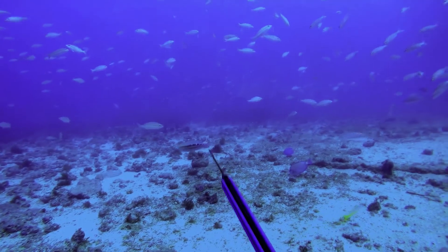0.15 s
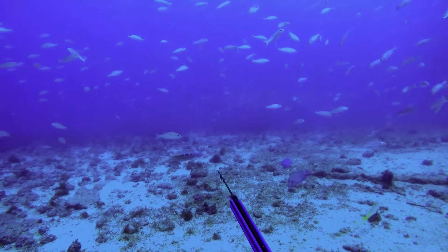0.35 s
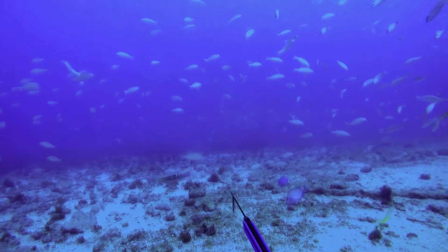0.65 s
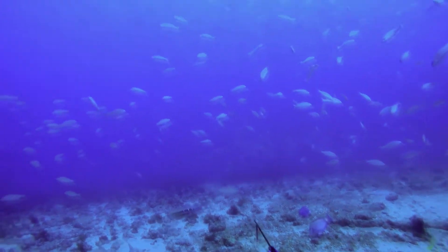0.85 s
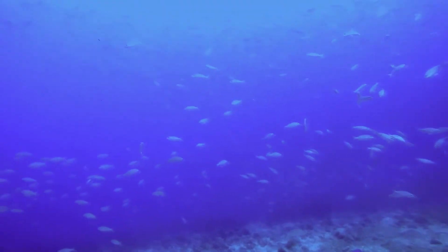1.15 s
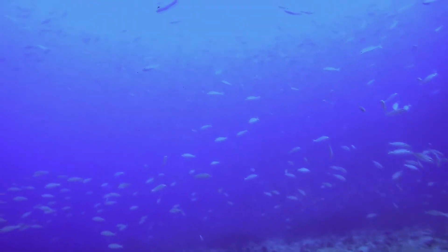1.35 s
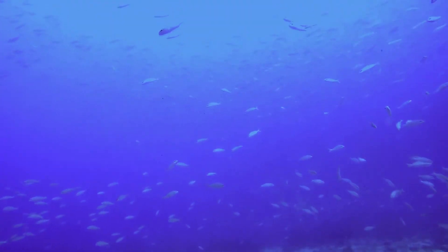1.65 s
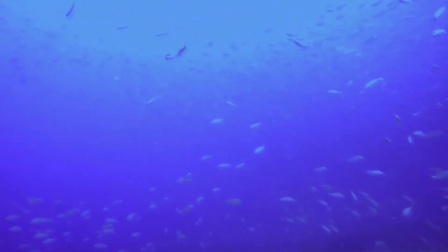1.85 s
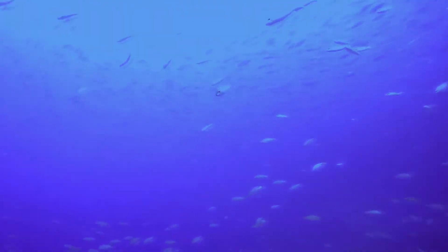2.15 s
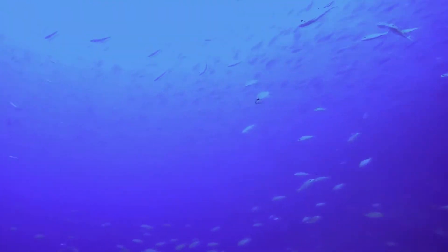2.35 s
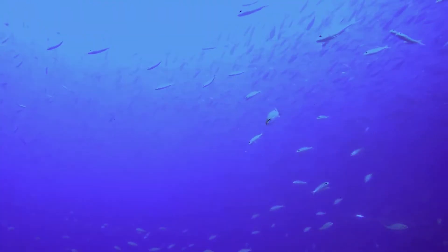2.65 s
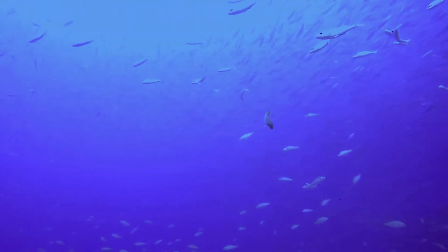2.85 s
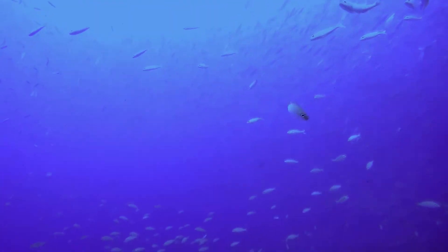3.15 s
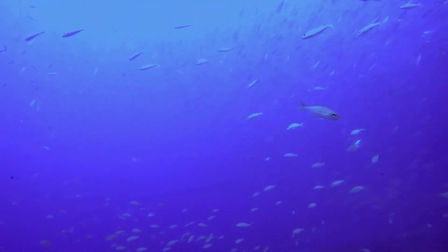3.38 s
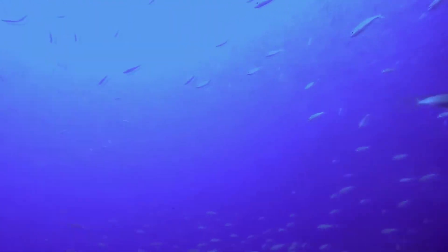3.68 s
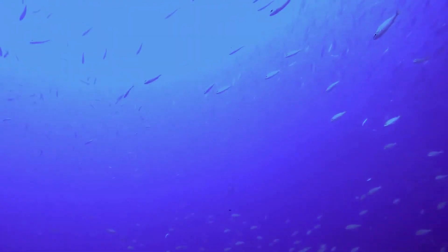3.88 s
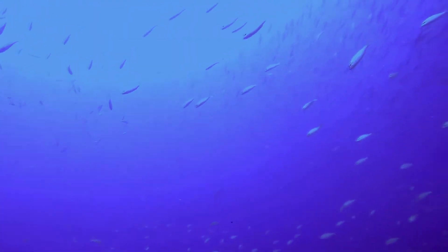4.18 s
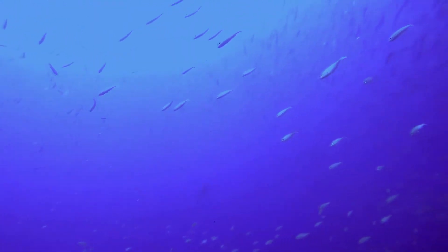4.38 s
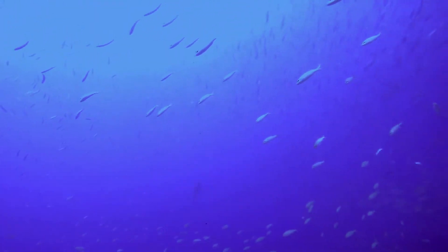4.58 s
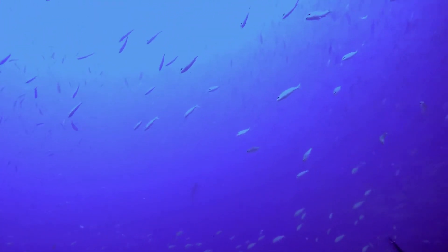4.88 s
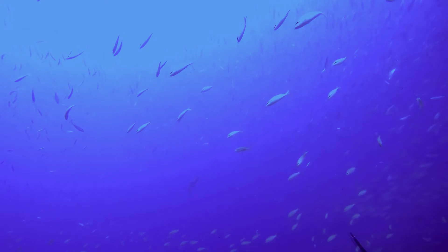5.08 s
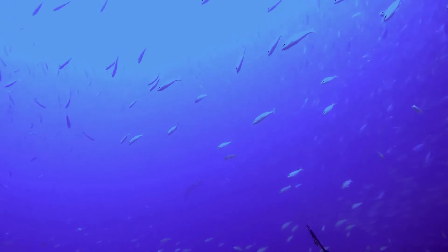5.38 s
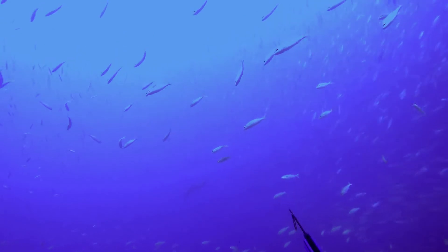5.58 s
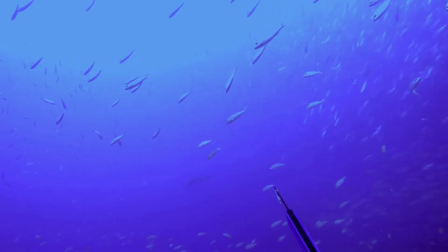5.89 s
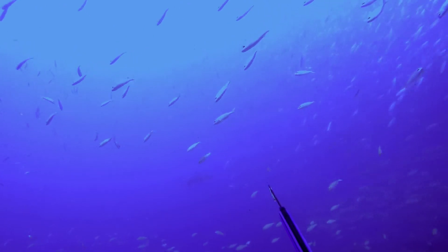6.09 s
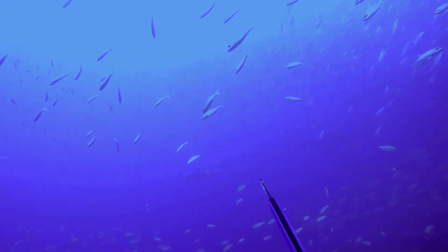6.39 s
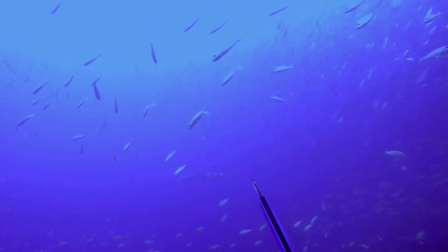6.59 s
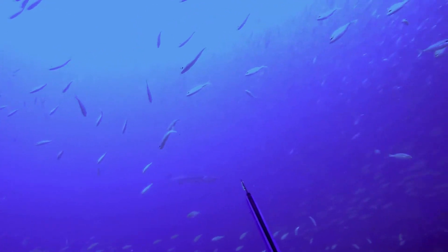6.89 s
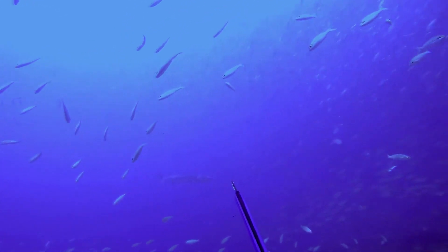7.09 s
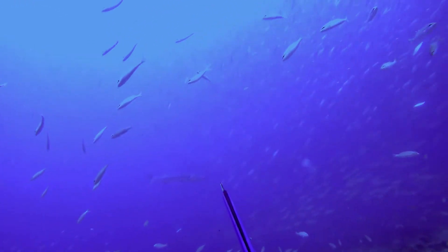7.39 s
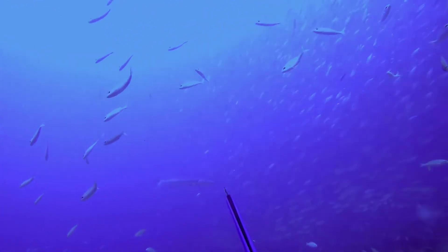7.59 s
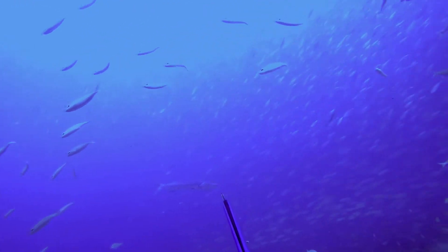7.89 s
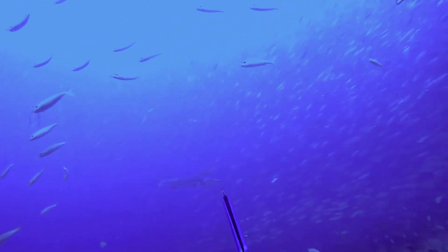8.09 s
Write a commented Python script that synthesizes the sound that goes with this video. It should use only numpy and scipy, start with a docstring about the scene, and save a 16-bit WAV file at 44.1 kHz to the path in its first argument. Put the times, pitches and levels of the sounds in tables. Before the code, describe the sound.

Underwater reef crackle over muffled water rumble and faint hiss, a distant low boat hum, then one loud hollow speargun thump late on.

```python
"""Over a reef, a diver hangs with a speargun; the microphone sits in a sealed plastic housing.
Shrimp snap near and far as noise bursts through the housing's resonances; shaped noise makes the
water's flow, its rumble and an even hiss; a distant boat engine hums as wavering sines.
Dull bursts make gear rattles, a bubble pip and a tick; falling tones make low thuds and a pressure surge.
One loud hollow thump from the gun flexes the housing and leaves it ringing, with a rising rubber squeak."""
import sys
import numpy as np
from scipy import signal
from scipy.io import wavfile
from scipy.ndimage import uniform_filter1d

SR = 44100
rng = np.random.default_rng(int(sys.argv[2]) if len(sys.argv) > 2 else 0)


def output_pcm(signal):
    """Save a mono or channel-first signal as 16-bit PCM at the path in sys.argv[1].

    Samples are clipped to [-1, 1] before scaling.
    """
    pcm = np.clip(np.atleast_2d(signal).T, -1, 1) * 32767
    wavfile.write(sys.argv[1], SR, np.round(pcm).astype(np.int16))


N = 363384   # length in samples


def from_db(db):
    """Decibels to gain."""
    return 10 ** (np.asarray(db) / 20)


def rms_one(x):
    """Scale to unit rms."""
    return x / np.sqrt(np.mean(x ** 2) + 1e-20)


def in_time(rows):
    """Columns of a curve table after its time column, one value per sample."""
    start_s, *columns = np.transpose(rows)
    t = np.arange(N) / SR
    return [np.interp(t, start_s, column) for column in columns]


def drift(rate_hz):
    """Slow random wander of unit rms: noise through a double one-pole low-pass."""
    r = np.exp(-2 * np.pi * rate_hz / SR)
    noise = rng.standard_normal(N + SR)
    settled = signal.lfilter([1], [1, -2 * r, r * r], noise)[SR:]
    return rms_one(settled)


def butter(x, hz, kind, order=2):
    """Butterworth filter along the last axis."""
    return signal.sosfilt(signal.butter(order, hz, kind, fs=SR, output="sos"), x)


def resonate(x, hz, width_hz):
    """One two-pole resonance, gain about 1 at its top."""
    r = np.exp(-np.pi * width_hz / SR)
    zeros = np.array([1, 0, -1]) * (1 - r * r) / 2
    poles = [1, -2 * r * np.cos(2 * np.pi * hz / SR), r * r]
    return signal.lfilter(zeros, poles, x)


def housing(x, extra_db=lambda hz: 0):
    """The housing's resonances in parallel, signs alternating; extra_db colours each one."""
    # resonances of the plastic housing: pitch_hz, width_hz, level_db
    resonances = [(733, 223, -4), (845, 104, 1.5), (1404, 1300, -25), (1685, 207, -7.5), (2018, 141, -9),
                  (2417, 223, -8.5), (2937, 250, -12.5), (3200, 233, -10), (3566, 230, -6.5),
                  (4850, 274, -10.5), (5580, 1380, -19.5), (6490, 576, -13.5), (6990, 890, -21.5),
                  (9560, 1550, -21), (12900, 1700, -28), (14240, 1140, -20.5), (14800, 1120, -23)]
    out = 0
    for k, (hz, width_hz, db) in enumerate(resonances):
        gain = from_db(db + extra_db(hz))
        out = out + (-1) ** k * gain * resonate(x, hz, width_hz)
    return out


def add(track, start_s, sound):
    """Mix a sound into the track at start_s."""
    i = round(start_s * SR)
    track[i:i + len(sound)] += sound[:len(track) - i]


def steady_hiss(level_db=-63.5, top_hz=15600):
    """An even hiss inside the housing: noise partly coloured by the upper modes."""
    white = rng.standard_normal((2, N))
    coloured = rms_one(housing(butter(white[0], 7300, "high")))
    hiss = coloured + from_db(-6.5) * butter(white[1], 900, "high")
    hiss = signal.sosfilt(signal.ellip(8, .3, 45, top_hz, fs=SR, output="sos"), hiss)
    return from_db(level_db) * rms_one(hiss)


def rumble(lumpy_db=2.5):
    """Water moving over the housing: low noise bands, the deepest swelling, the upper ones lumpy together."""
    # slow swell; its mean also places the whole rumble: start_s, level_db
    swell = [(0.0, -51.5), (0.8, -58.5), (1.5, -52), (1.8, -44), (2.4, -52), (3.05, -56.5), (3.4, -55),
             (4.05, -53.5), (4.86, -54), (5.4, -51), (5.85, -48), (6.45, -56.5), (6.82, -45), (7.1, -53),
             (7.4, -52), (7.8, -59), (8.24, -64)]
    # relative noise density over pitch: pitch_hz, level_db (per Hz)
    colour = [(8, -4), (15, -1), (35, -6), (70, -5.5), (140, -20.5), (190, -22.5), (250, -16.5),
              (330, -30.5), (600, -25.5), (900, -54)]
    (swell_db,) = in_time(swell)
    mean_db = swell_db.mean()
    hz_points, db_points = np.transpose(colour)
    lumps_db = lumpy_db * drift(28)
    edges = 8 * 2 ** np.arange(0, 7.1, 1 / 3)   # third-octaves from 8 Hz
    out = 0
    for low, high in zip(edges, edges[1:]):
        hz = np.sqrt(low * high)
        band = butter(rng.standard_normal(N + SR), [low, high], "band")[SR:]
        follows = np.clip(60 / hz, 0, 1)   # share of the swell this band takes
        colour_db = np.interp(np.log(hz), np.log(hz_points), db_points)
        moving_db = follows * (swell_db - mean_db) + lumps_db * (hz > 80)
        out = out + band * from_db(colour_db + moving_db)
    return from_db(mean_db + 3.5) * rms_one(out)


def water(grains_per_s=2500, size_db=3., flicker_db=1.82):
    """Smooth flow noise shakes the lower modes; countless far snaps merge into grainy hiss in the middle ones."""
    # levels before the colours move: start_s, flow_db, reef_db, favoured_pitch_octaves (above 4 kHz)
    curves = [(0.0, -54.5, -58, 0.73), (0.8, -57, -59.5, 0.3), (1.8, -53, -58, 0.6), (2.3, -56, -57, .28),
              (2.9, -57, -58, .25), (3.25, -57, -53.5, 0.38), (3.67, -55.5, -58.5, .24),
              (4.3, -55, -55.5, 0.16), (4.86, -54, -58.5, -0.058), (5.1, -56.5, -57, -.2),
              (5.5, -54.5, -57.5, -0.19), (5.8, -59, -61.5, 0.062), (6.3, -54, -65.5, 0.76),
              (7.02, -54, -60.5, 0.29), (7.4, -55, -63, 0.53), (7.92, -59, -59, 0.33),
              (8.24, -58, -67.5, .28)]
    flow_db, reef_db, favoured = in_time(curves)
    flow = housing(butter(rng.standard_normal(N), 3500, "low"), lambda hz: flicker_db * drift(15.0))

    sizes = from_db(size_db * np.minimum(rng.exponential(1, N), 4.5)) * rng.choice([-1, 1], N)
    chance = grains_per_s * from_db(2.5 * drift(25)) / SR   # crackle thickens and thins
    grains = rms_one(sizes * (rng.random(N) < chance))
    far = butter(grains + 0.68 * rng.standard_normal(N), [2800, 8000], "band")   # distance dulls them
    reef = housing(far, lambda hz: -12 * (np.log2(hz / 4000) - favoured) ** 2)
    return from_db(flow_db) * rms_one(flow) + from_db(reef_db) * rms_one(reef)


def engine(half_order_db=-51, waver_db=2.0):
    """Firing tone, weak overtones and a half order, wavering on the long way through the water."""
    # distant boat engine before the waver: start_s, firing_hz, firing_db (rms)
    curves = [(0.0, 66.7, -57), (0.4, 66.55, -61.5), (0.75, 66.7, -50.5), (1.4, 66.54, -56),
              (1.65, 65.75, -48), (2.13, 64.56, -43.5), (2.85, 64.65, -53.5), (3.2, 66.35, -62.5),
              (3.75, 66.15, -47.5), (4.35, 66.3, -50.5), (4.7, 65.7, -52.5), (5.15, 66.14, -49),
              (6.24, 66.4, -52), (6.9, 66.2, -44), (7.7, 66.5, -51), (8.24, 67, -56)]
    hz, firing_db = in_time(curves)
    half_db = half_order_db + 2.85 * drift(4.4)
    turn = np.cumsum(np.pi * hz / SR)   # phase of the half order
    firing = np.sin(2 * turn) + 0.044 * np.sin(4 * turn) + 0.0084 * np.sin(6 * turn)
    half = np.sin(turn + 0.54 * drift(6.5))
    wavering_db = firing_db + waver_db * drift(5)
    return np.sqrt(2) * (from_db(half_db) * half + from_db(wavering_db) * firing)


def snaps(rows, tail_db=-19, tail_ms=10.2, spread_db=1.0):
    """A collapsing bubble: a crack and a noise burst with a faint scattered tail, ringing the housing."""
    start_s, level_db, centre, spread, burst_ms = np.transpose(rows)[:, :, None]
    ms = np.arange(1600) * 1000 / SR
    noise = rng.standard_normal((len(start_s), len(ms)))
    dull = butter(noise, 14000, "low", order=1)   # scattering dulls the tail
    tail = from_db(tail_db) * np.exp(-ms / tail_ms) * dull
    bursts = noise * np.exp(-(ms / burst_ms) ** 2) + tail
    bursts[:, 0] = 3.7   # the crack
    bursts = butter(bursts, 1800, "high", order=3)

    def colour_db(hz):
        octaves = np.log2(hz / 4000)
        hump_db = -1.4 * ((octaves - centre) / np.clip(spread, .2, 2)) ** 2
        return hump_db + 2.54 * octaves + rng.normal(0, spread_db, start_s.shape)

    rung = housing(bursts, colour_db)
    treble_power = butter(rung, 3970, "high", order=4) ** 2
    top = uniform_filter1d(treble_power, size=44).max(axis=1)   # loudest millisecond
    out = np.zeros(N)
    for when, db, sound, power in zip(start_s[:, 0], level_db[:, 0], rung, top):
        add(out, when, sound * from_db(db) / np.sqrt(2 * power))   # level as peak of an equally strong sine
    return out


def fainter_snaps(count=450):
    """Shrimp further off: random moments, levels, colours and burst lengths, as rows for snaps()."""
    draw = rng.random((count, 5))
    start_s = draw[:, 0] * N / SR
    level_db = -54 - 4.8 * np.log(draw[:, 1] + 0.053)   # mostly faint, a few louder
    centre_octaves = -.2 + 2.6 * draw[:, 2]
    spread_octaves = 0.13 + 0.68 * draw[:, 3]
    burst_ms = 0.92 + 1.3 * draw[:, 4]
    return np.column_stack([start_s, level_db, centre_octaves, spread_octaves, burst_ms])


def near_snaps(spread_octaves=0.52):
    """Near shrimp share one width of colour; fainter snaps last longer and brighter ones shorter."""
    # near shrimp: start_s, level_db, centre_octaves (colour above 4 kHz, before the treble tilt)
    near = [(0.113, -30.5, 0.81), (0.3916, -31.5, 1.7), (0.6972, -35, 1.06), (0.7272, -32, 0.65),
            (0.7361, -28.5, 1.3), (1.1145, -39, 0.96), (1.133, -32, 1.7), (1.2006, -41, 1.6),
            (1.2487, -33, 1.48), (1.2972, -32, 1.2), (1.3164, -27.5, 1), (1.3243, -24.5, 1.4),
            (1.4362, -25.5, 1.45), (1.886, -41, 1.9), (1.968, -40, 2), (2.1712, -38, 1.32),
            (2.5192, -41.5, 1.3), (2.585, -28.5, 1.23), (2.615, -38.5, 0.45), (2.6326, -30.5, 2),
            (2.7575, -41, 1.3), (2.8044, -39.5, 1.2), (2.8251, -34.5, 2), (2.917, -29, 1.35),
            (2.942, -31, 1.75), (3.0905, -21.5, 0.86), (3.105, -28, 1.8), (3.111, -18.5, 0.74),
            (3.214, -17, 0.59), (3.3635, -41, 1.75), (3.6295, -27, 0.78), (3.9677, -37, 1.37),
            (3.9731, -28, 1.2), (4.1301, -27, 0.26), (4.1501, -35, 0.5), (4.2316, -40, 0.96),
            (4.2535, -42, 0.99), (4.6558, -36, 1.21), (4.6738, -36.5, 1.37), (4.9221, -37, 0.92),
            (4.9362, -33.5, 0.82), (5.0647, -34.5, 1.7), (5.1889, -21, 1.39), (5.2934, -33.5, 1.17),
            (5.3063, -36, 1.3), (5.4073, -11, 0.36), (5.4582, -37, 1.8), (5.4846, -33.5, 1.54),
            (5.6063, -38.5, 1.12), (5.649, -41, 0.69), (5.9205, -28.5, 1.7), (6.0926, -41, 0.71),
            (6.1017, -32, 1.8), (6.1093, -41, 0.93), (6.162, -39, 1), (6.3485, -38, 1.87),
            (6.656, -43, 1.4), (6.7259, -36, 1.25), (6.8432, -32, 0.87), (6.945, -42.5, 1.5),
            (6.9903, -41.5, 1.2), (7.0839, -39.5, 0.81), (7.2113, -42.5, 1.4), (7.373, -35.5, 0.87),
            (7.8136, -38.5, 2.5), (7.871, -41, 1.83), (8.0678, -37, 1.05), (8.1084, -29, 1.3),
            (8.1296, -30, 1.23)]
    start_s, level_db, centre = np.transpose(near)
    fainter_db = level_db.max() - level_db
    burst_ms = 1.34 + 0.0833 * fainter_db - .5 * centre   # ms per dB, ms per octave
    burst_ms = np.maximum(burst_ms, .4)
    spread = np.full(len(start_s), spread_octaves)
    return np.column_stack([start_s, level_db, centre, spread, burst_ms])


def dull_bursts():
    """Dull noise bursts in the housing: mostly gear rattles, with a bubble pip and a short tick."""
    # rattles, pip (1.998 s) and tick (4.6665 s): start_s, level_db (rms over the length), length_ms, centre_hz
    hits = [(.030, -24.5, 8.4, 2920), (0.052, -37.5, 9, 3260), (.085, -42, 8.8, 2800),
            (.117, -52, 8.8, 2900), (.139, -44, 8.2, 3000), (0.159, -43.5, 15, 3240),
            (.214, -48.5, 11, 1960), (.271, -49, 11, 1850), (1.998, -47, 5.4, 2950), (3.164, -49, 4, 3500),
            (3.264, -44, 3.5, 2000), (3.276, -49, 15, 2600), (3.461, -51, 3, 1900), (4.129, -39, 8.6, 3680),
            (4.15, -43, 5.1, 3380), (4.6665, -42.5, 2.1, 1680), (5.780, -31, 7.4, 2320),
            (5.790, -43, 13.6, 2100), (5.908, -51, 7.8, 1280), (5.969, -53, 1.84, 1787),
            (6.931, -43.5, 8, 1870), (7.258, -46.5, 3, 3705)]
    out, t_ms = np.zeros(N), np.arange(SR // 20) * 1000 / SR
    for start_s, db, ms, hz in hits:
        envelope = np.exp(-(t_ms / ms) ** 3) + 0.27 * np.exp(-t_ms / (2.1 * ms))
        burst = rng.standard_normal(len(t_ms)) * envelope
        rung = housing(burst, lambda mode_hz: -9 * np.log2(mode_hz / hz) ** 2)   # favour modes near hz
        sound = butter(rung + 0.2 * resonate(burst, hz, 2000), 3580, "low", order=8)
        power = np.mean(sound[:round(ms * SR / 1000)] ** 2)
        add(out, start_s, from_db(db) * sound / np.sqrt(power))
    return out


def low_thuds(fall_cycles=0.98):
    """Low thuds with falling pitch, and one slow deep pressure surge at 4.37 s: decaying, gliding sines."""
    # before the low-pass: start_s, peak_db, first_hz, last_hz, decay_ms, sign (push +1, pull -1)
    thuds = [(.031, -37.5, 446, 154, 8.4, 1), (1.652, -33, 304, 60.25, 13, 1),
             (1.7599, -19.5, 750, 132.8, 7.3, 1), (1.861, -27.5, 500, 109.4, 2.6, 1),
             (4.369, -23.5, 45, 25.15, 33, -1), (4.913, -39, 401, 92.4, 5.1, 1),
             (5.048, -35.5, 600, 127.3, 7.5, 1), (5.773, -29, 600, 300, 3.7, 1),
             (5.781, -33, 414, 119.2, 12, 1), (5.858, -36, 454, 108, 8.4, 1),
             (5.911, -38, 401, 150, 3.6, 1), (5.967, -43, 400, 119.1, 8.2, -1),
             (6.740, -43, 250, 90, 13.5, 1), (6.77, -40, 251.7, 100, 12, 1), (6.867, -28, 470, 300, 2.7, 1),
             (6.933, -33, 449, 200.7, 2.2, 1)]
    out, t_ms = np.zeros(N), np.arange(SR // 8) * 1000 / SR
    for start_s, db, first_hz, last_hz, decay_ms, sign in thuds:
        fall = np.exp(-t_ms / 1000 * first_hz / fall_cycles)   # within about one cycle of the first pitch
        hz = last_hz + (first_hz - last_hz) * fall
        tone = np.sin(np.cumsum(2 * np.pi * hz / SR))
        add(out, start_s, np.sign(sign) * from_db(db) * np.exp(-t_ms / decay_ms) * tone)
    return butter(out, 820, "low")


def squeak(start_s=5.781):
    """Rubber slips on the gun with the thump: a rising tone of randomly rough level."""
    # the slip, before fade and roughness: level_db, first_hz, last_hz, length_ms
    slip = (-31.5, 3392, 4597, 19)
    db, first_hz, last_hz, ms = slip
    out, share = np.zeros(N), np.linspace(0, 1, round(ms * SR / 1000))
    hz = first_hz + (last_hz - first_hz) * share
    tone = np.sin(np.cumsum(2 * np.pi * hz / SR))
    rough = 1 + 0.37 * rms_one(butter(rng.standard_normal(len(share)), 600, "low"))
    envelope = from_db(db - 11 * share) * np.sin(np.pi * share) ** .5
    add(out, start_s, envelope * rough * tone)
    return out


def knocks(buzz_db=-13):
    """The wall flexes for a few cycles while it is pressed, then its modes ring on freely."""
    # hollow knocks, the loudest is the gun: start_s, level_db (about the peak of the flex), press_ms
    presses = [(.031, -31, 7.2), (.043, -35.5, 6.5), (.088, -46, 10), (1.615, -29.5, 11),
               (1.866, -33.5, 4.6), (2.742, -44, 15), (2.783, -42.5, 14), (3.264, -31, 5.9),
               (3.278, -33, 10.2), (3.288, -35, 4.6), (3.459, -27, 6), (3.466, -32, 5.8),
               (4.986, -43.5, 14), (5.000, -41, 10), (5.7800, -8, 10.3), (5.906, -35, 10),
               (5.966, -39, 5.9), (6.926, -34, 5.47), (6.9325, -27, 9.5)]
    # free wall modes: pitch_hz, level_db (relative), t60_s
    wall_modes = [(850, 5.5, 0.047), (931, -10.5, 0.078), (2020, -16, 0.053), (1420, -22, 0.054)]
    out, free_s = np.zeros(N), np.arange(SR // 10) / SR
    ring = 0
    for k, (hz, db, t60_s) in enumerate(wall_modes):
        decay = from_db(db - 60 * free_s / t60_s)
        ring = ring + (-1) ** k * decay * np.sin(2 * np.pi * hz * free_s)   # neighbours start opposed
    ring *= 1 - np.exp(-free_s / 0.00088)   # soft onset
    hardest_db = max(db for _, db, _ in presses)
    for start_s, db, ms in presses:
        lighter_db = hardest_db - db
        hz = 731 + 0.94 * lighter_db   # a lighter knock flexes a little higher
        ring_db = -7.5 - 0.86 * lighter_db   # and rings on relatively less
        t = np.arange(round(ms * SR / 1000)) / SR
        turn = 2 * np.pi * hz * t
        flex = np.sin(turn) + 0.1 * np.sin(2 * turn) + 0.025 * np.sin(3 * turn)   # a stiff wall adds overtones
        press = np.sin(np.pi * t * 1000 / ms)
        add(out, start_s, -from_db(db) * press * flex)
        add(out, start_s + ms / 1000, from_db(db + ring_db) * ring)
    buzz = butter(np.abs(out), [1300, 3200], "band")   # the moving wall slaps its seat
    return out + from_db(buzz_db) * buzz


def scene():
    """Everything reaches one microphone."""
    background = steady_hiss() + rumble() + water() + engine()
    shrimp = snaps(fainter_snaps()) + snaps(near_snaps())
    hits = dull_bursts() + low_thuds() + squeak() + knocks()
    return (background + shrimp + hits)[None]


def record(dry):
    """The top octave is dulled by about 14 dB above 15250 Hz, then cut at 16500 Hz."""
    dulling = signal.ellip(5, .5, 14, 15250, fs=SR, output="sos")
    cut = signal.ellip(10, .3, 75, 16500, fs=SR, output="sos")
    return signal.sosfilt(cut, signal.sosfilt(dulling, dry))


dry = scene()
out = record(dry)
output_pcm(out)
```